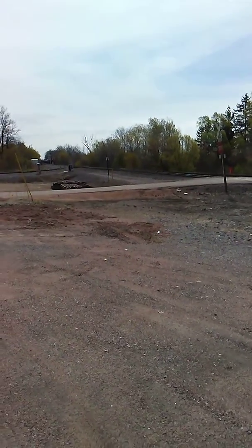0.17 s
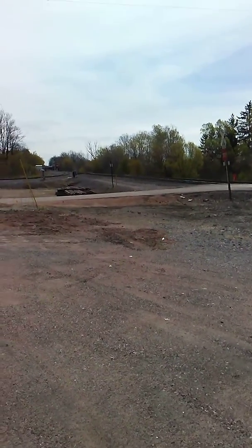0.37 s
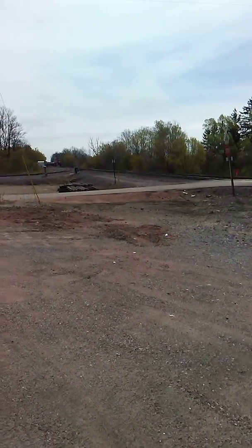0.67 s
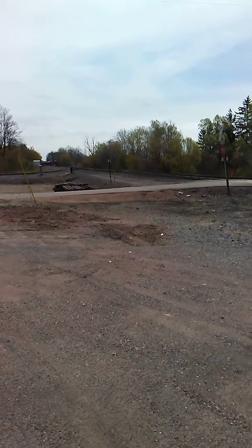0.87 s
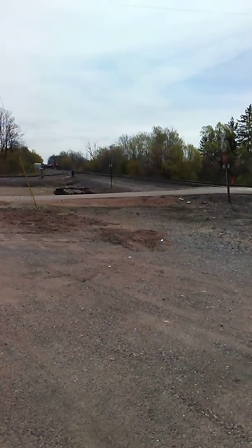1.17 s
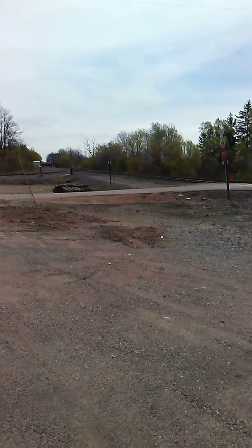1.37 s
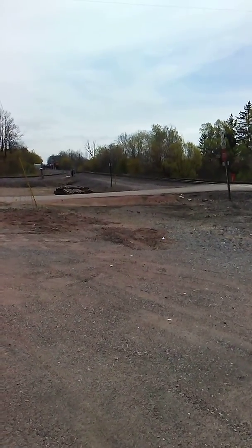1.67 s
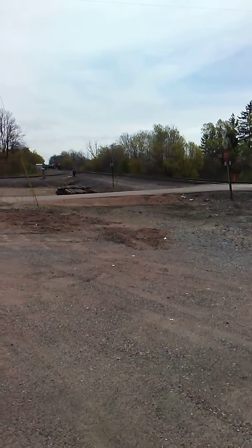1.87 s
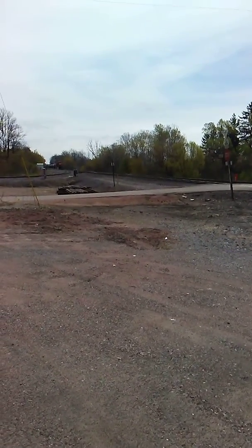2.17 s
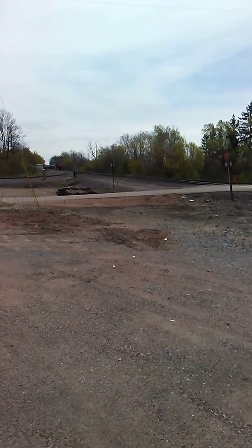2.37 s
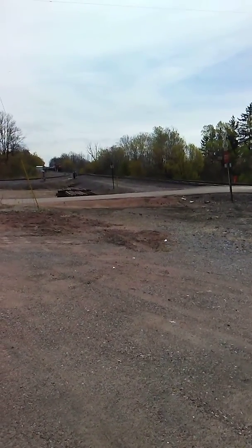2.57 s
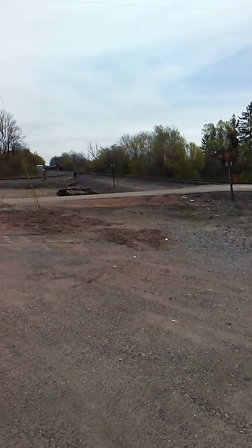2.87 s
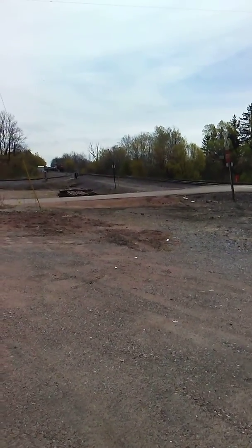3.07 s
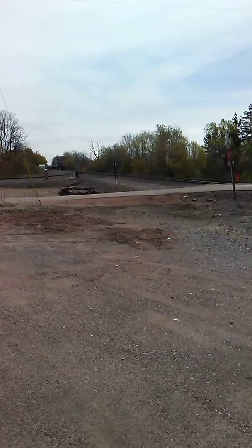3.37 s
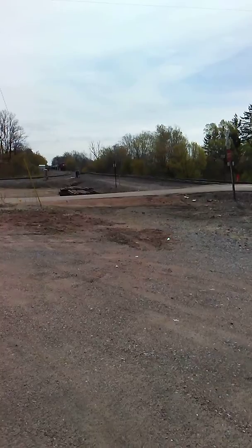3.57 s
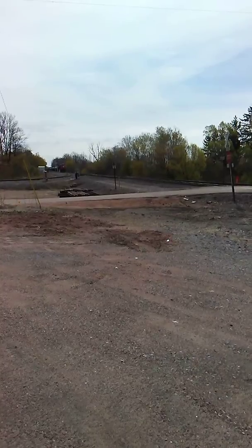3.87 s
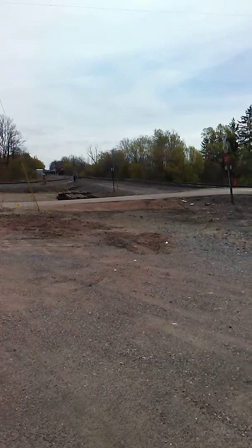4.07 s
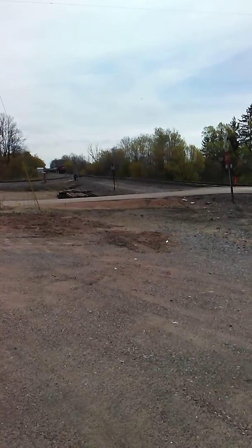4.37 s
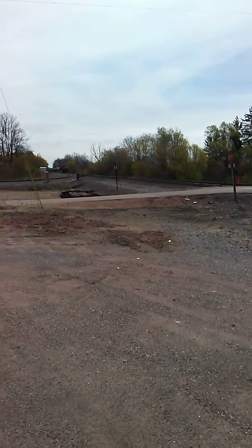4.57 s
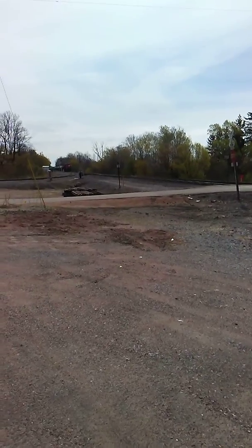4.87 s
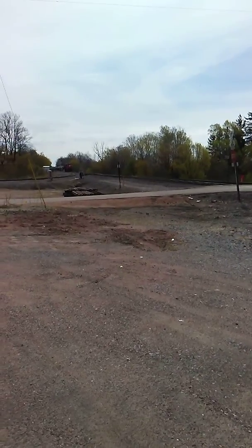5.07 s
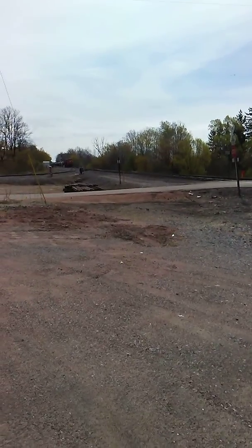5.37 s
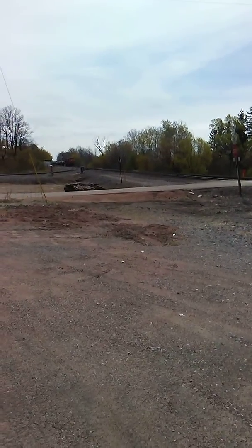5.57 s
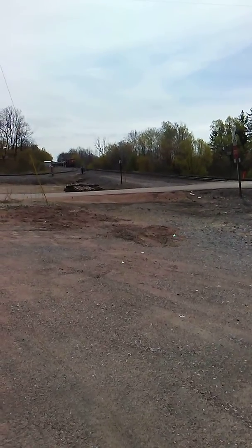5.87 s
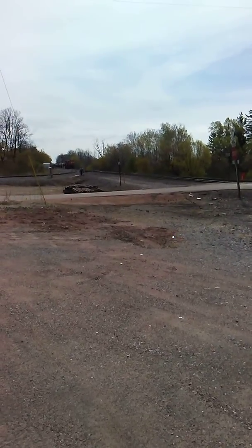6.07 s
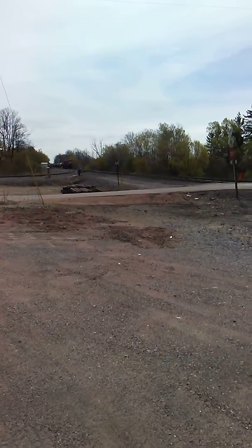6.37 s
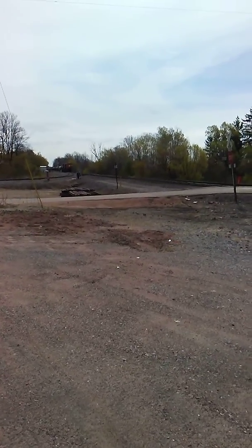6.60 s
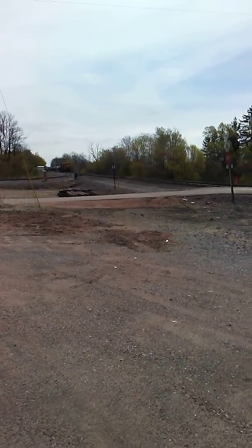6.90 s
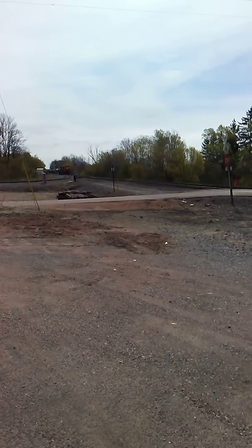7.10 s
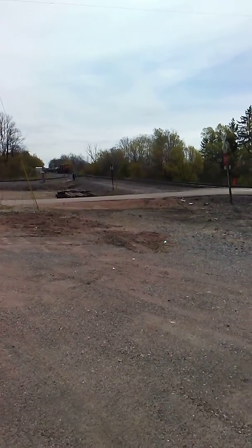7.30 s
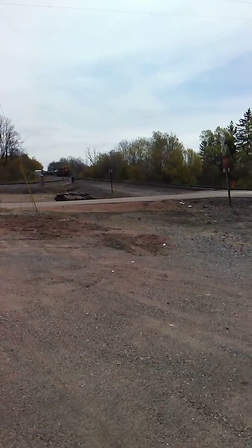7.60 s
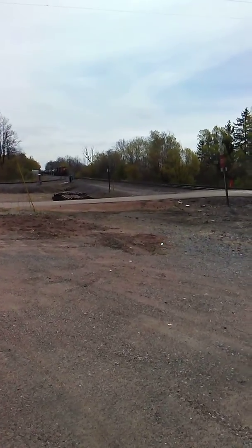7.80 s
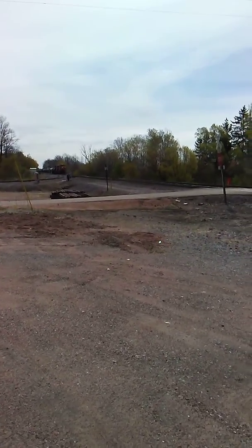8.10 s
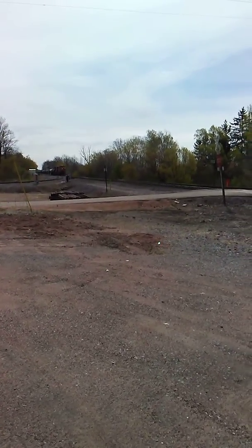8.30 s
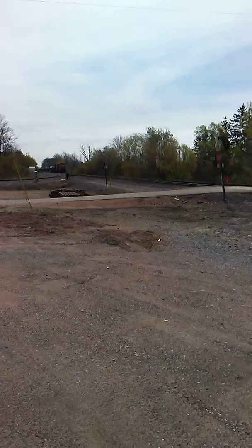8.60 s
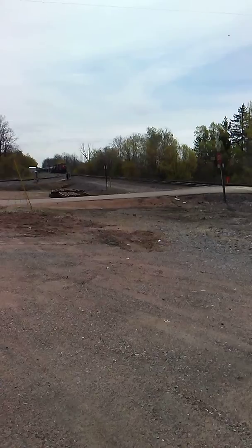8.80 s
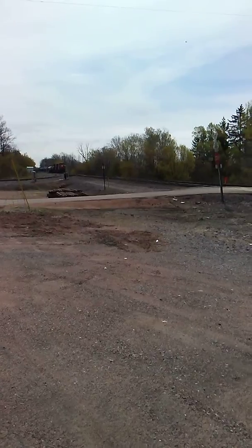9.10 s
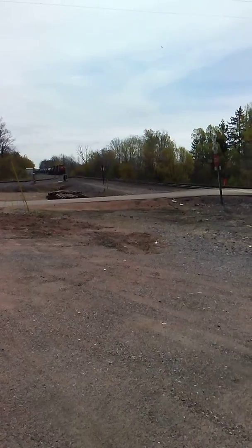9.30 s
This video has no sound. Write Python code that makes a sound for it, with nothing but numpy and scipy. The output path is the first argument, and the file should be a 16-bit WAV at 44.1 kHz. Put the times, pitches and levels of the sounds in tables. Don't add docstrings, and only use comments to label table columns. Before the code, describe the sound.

Open country beside a rural rail crossing, heard through a phone microphone. In the first 1.2 s there is soft air hiss, a brief wind puff, small dry gravel ticks close by and two faint strokes of a far bell. At 1.2 s an oncoming freight locomotive sounds a loud, dissonant chord of six air trumpets, held until about 5.1 s; its tones fade and swell separately in moving air, with a hazy echo from trees. Wind flutters from 3 s. The chord sags into a reverberant tail as, from 5.7 to 7.4 s, hard gusts thump and crackle against the microphone. A high, quick sparrow trill runs from 5.7 to 7.6 s, with faint bell strokes from 5.6 to 8.4 s. Low diesel drone and wheel roar grow, with soft flange swishes. At 8.5 s a nearer, stronger horn blast bursts in, brightening as rails sing faintly, and cuts off at 9.4 s.

```python
import sys
import numpy as np
from scipy import signal
from scipy.fft import rfft, irfft, next_fast_len
from scipy.io import wavfile
from scipy.ndimage import uniform_filter1d, minimum_filter1d

SR = 44100
rng = np.random.default_rng(int(sys.argv[2]) if len(sys.argv) > 2 else 0)


def gain_from_decibels(decibels):
    exponent = np.asarray(decibels, float) / 20
    return 10 ** exponent


def master_out(mix):
    frames = np.transpose(np.atleast_2d(mix))
    ceiling = np.clip(frames, -1, 1)
    pcm = np.round(ceiling * 32767).astype(np.int16)
    wavfile.write(sys.argv[1], SR, pcm)


N = 416744
T = np.arange(N) / SR

# frequency in Hz, level in dB per Hz.
AIR_SPECTRUM = [(4200, -22), (4600, -6.5), (5500, -7), (6400, -3), (8000, 0), (11000, -2), (15800, -8.5),
                (16500, -55)]
# time in seconds, peak in dB.
GRAVEL_TICKS = [(0.1191, -49.5), (0.1945, -47.5), (0.3027, -62.5), (0.4658, -45.5), (0.6145, -45),
                (0.7637, -39), (0.8594, -39), (0.9544, -50), (1.072, -42.5), (1.2186, -41), (2.415, -35.5)]
# time in seconds, then the level of each partial in dB.
BELL_STROKES = [(.1, -49.5, -47, -56), (.55, -50, -46, -55), (5.6, -46.5, -54, -49),
                (6.13, -40.5, -36, -53), (6.48, -42, -51, -46), (6.74, -39.5, -58, -49),
                (7.25, -50, -46, -50), (7.6, -54, -54, -52), (8.14, -44.5, -49, -52), (8.4, -42, -47, -46)]
BELL_PARTIALS_HZ = [1205, 2016, 1570]
# frequency in Hz, level in dB per Hz.
ROLL_SPECTRUM = [(24, -64.5), (40, -37.5), (70, -14), (86, -11), (120, -13.5), (239, -2.5), (333, -22.5),
                 (433, -21), (770, -10.5), (951, -26.5), (1220, -12.5), (1510, -17.5), (2010, -11.5),
                 (2210, -19), (3100, -35), (3900, -32.5), (5000, -61)]
# time in seconds, level in dB.
ROLL_LEVEL = [(0, -35), (1.2, -34), (5.8, -30.5), (6.07, -30.5), (6.19, -26), (6.36, -28.5), (6.7, -29.5),
              (7.1, -31), (7.5, -30), (8.4, -28.5), (9.45, -30)]
# frequency in Hz, level in dB.
DIESEL_ORDERS = [
    (53.8, -52),
    (75.4, -46),
]
# centre in seconds, half length in seconds, level in dB.
FLANGE_SWISHES = [
    (6.3, .12, -61),
    (6.8, .1, -55),
    (7.43, 0.12, -44),
    (7.952, 0.059, -46),
    (8.397, 0.21, -41.5),
]
# time in seconds, level in dB.
BREEZE_LEVEL = [(0, -38.5), (.6, -48.5), (2.5, -40.5), (4, -41), (5.6, -30), (7.5, -31.5), (8.4, -28),
                (8.7, -35), (9.45, -35)]
# centre in seconds, half length in seconds, then buffet, deep rumble and
# bright rush in dB.
PORT_EDDIES = [(0.21, .04, -24.5, -52, -23.5), (0.723, 0.02, -38, -48, -44), (3, 0.065, -38, -54, -50),
               (3.423, 0.047, -33.5, -50, -51.5), (3.597, 0.026, -28.5, -54.5, -45),
               (4.132, 0.038, -35.5, -40, -47), (4.29, 0.035, -23.5, -33, -43),
               (4.466, 0.057, -26, -40, -45), (4.803, 0.17, -30, -50.5, -46), (5.19, 0.1, -22, -44.5, -35),
               (5.453, .08, -35, -39, -38), (5.733, 0.086, -44, -50, -28),
               (5.946, 0.074, -24.5, -35, -24.5), (6.058, 0.068, -26, -36, -15),
               (6.12, 0.012, -30, -40, -13), (6.33, 0.13, -22, -33, -24), (6.73, 0.054, -25, -30.5, -17.5),
               (6.898, 0.08, -22, -45, -24), (7.05, 0.087, -22.5, -33, -26.5),
               (7.278, 0.083, -24.5, -37, -16), (7.557, 0.13, -28, -40, -28),
               (7.71, 0.076, -35.5, -36, -35), (7.93, 0.056, -40, -38, -34),
               (8.213, 0.093, -32, -49, -25.5)]
# time in seconds, peak in dB, ringing in Hz, snap in dB.
GUST_KICKS = [(0.196, -29, 243, -27), (5.775, -7, 178, -31), (5.96, -8, 287, -22), (6.011, -0.5, 308, -19),
              (6.037, -0.5, 292, -23), (6.119, 3, 286, -10), (6.706, 1, 290, -22), (6.918, -5, 332, -30),
              (6.947, -1.5, 295, -32), (7.261, -3, 420, -4), (7.344, -3, 258, -6), (8.201, -27, 190, -15)]
# valve opens in seconds, then the opening level of the 760 Hz, low, middle and high lines
# in dB.
HORN_BLASTS = [
    (1.196, -18.5, -17, -24, -23.5),
    (8.522, -11, -12.5, -19, -21),
]
# end in seconds, pressure build-up in seconds, settled pitch of the middle
# trumpet in Hz, first sharpness in Hz.
AIR_SUPPLY = [
    (5.6, .035, 379, 6.5),
    (9.45, .012, 379.5, 7),
]
# lag of tones under 450 Hz in seconds, lag of the three high trumpets in
# seconds.
BELL_FILLING = [
    (.02, 0.4),
    (.35, 0.007),
]
# the 760 Hz, low, middle and high lines in dB per second.
NEARING_GAIN = [
    (1.53, 0.24, 1.94, 0.65),
    (0.48, -1.4, 4, 6.8),
]
# the 760 Hz, low, middle and high lines in dB per second.
DYING_FALL = (52, 13, 44, 53)
# rest pitch in Hz, how strongly low air pressure sharpens it (a ratio).
HORN_TRUMPETS = [
    (274.6, 1.1),
    (324.3, 1.1),
    (379.2, 1),
    (494.4, .6),
    (527.0, 1.8),
    (603.0, 1.1),
]
HORN_OVERTONES = [
    [-32, -38, -31.5, -27, -34.5, -27, -29, -41, -39, -51, -60, -53, -53, -49.5, -66.5],
    [-25, -25, -30.5, -28.5, -34, -40.5, -33.5, -46.5, -57, -57.5, -48, -55],
    [-31.5, -13, -29, -26.5, -20, -31, -36.5, -48, -44.5, -52.5, -59.5],
    [-25.5, -34.5, -41, -33, -44, -56.5, -50, -56.5],
    [-23.5, -35.5, -28.5, -30.5, -50.5, -55, -51.5],
    [-34, -40, -37],
]
# centre in seconds, half length in seconds, lines around
# this frequency in Hz, change in dB.
AIR_BENDS = [(1.437, .13, 760, 3), (1.454, .08, 1300, 3), (1.704, 0.041, 2000, 1.5),
             (2.026, .13, 760, -10.5), (2.309, 0.3, 760, -5), (2.426, .12, 450, 2), (2.909, 0.061, 760, -3),
             (3.048, 0.19, 450, 3), (3.104, 0.16, 2000, 1.5), (3.101, 0.17, 760, -3.5),
             (3.443, 0.22, 450, 2), (3.797, 0.32, 760, 3), (3.85, 0.13, 1300, -1.5),
             (3.695, .3, 2000, -0.5), (4.122, .1, 2000, 7), (4.264, .18, 1300, 3), (4.483, 0.17, 2000, 4.5),
             (4.494, .1, 450, -1), (4.948, 0.17, 760, 0.5), (5.17, 0.087, 760, -5), (5.34, 0.07, 760, 3.5),
             (5.349, 0.12, 450, 4), (8.541, .03, 450, 5), (8.589, .06, 1300, -2.5), (8.759, 0.089, 760, 1),
             (9.33, 0.073, 760, 0)]
# centre in seconds, half length in seconds,
# frequency in Hz, change in dB.
AIR_GLINTS = [(1.5, .2, 1330, 3.5), (1.45, .3, 973, -6), (1.4, .2, 1200, 0.5), (2.3, .08, 2274, 5.5),
              (3.2, .08, 1100, 5.5), (3.1, .1, 2000, 6), (2.8, 0.82, 650, -2.5), (3.6, 0.32, 1050, 3.5),
              (3.2, .4, 1900, -3), (3.3, 0.17, 2000, 1.5), (4.6, .45, 1560, 3.5), (5.5, 0.38, 1330, -4.5),
              (5.1, .2, 850, 1.5), (9, 0.22, 1900, 3.5), (9.25, 0.23, 1600, -3.5), (8.75, 0.23, 350, -3.5),
              (1.55, .12, 530, 5), (1.7, 0.32, 650, -5), (2.2, .2, 1100, -4), (2.35, 0.23, 535, -4),
              (2.6, .2, 490, 5), (3.25, .15, 535, -6), (3.5, 0.18, 1300, 6.5), (3.5, .5, 1500, -4),
              (4.4, .4, 380, -3), (5.1, 0.29, 490, -5), (8.6, .1, 650, 4), (8.9, .15, 1090, 3),
              (9, 0.38, 1660, -4.5), (9.1, .3, 320, -3)]
# frequency in Hz, level in dB.
MIC_WHINE = [(14080, -77.5), (14450, -86), (15240, -81), (15350, -84.5), (15490, -84), (15680, -89.5)]


def unit(x):
    return x / np.sqrt(np.mean(np.abs(x) ** 2))


def curve(rows):
    s, *columns = np.transpose(rows)
    return np.array([np.interp(T, s, c) for c in columns])


def coloured(points):
    hz, db = np.transpose(points)
    size = next_fast_len(N)
    f = np.fft.rfftfreq(size, 1 / SR) + 1e-3
    gain = gain_from_decibels(np.interp(np.log(f), np.log(hz), db))
    return unit(irfft(rfft(rng.standard_normal(size)) * gain, size)[:N])


def wander(rate, size=N):
    step = 64
    pole = np.exp(-2 * np.pi * rate * step / SR)
    slow = signal.lfilter([1], np.poly([pole] * 2), rng.standard_normal(size // step + 2))
    return np.interp(np.arange(size) / step, np.arange(len(slow)), unit(slow))


def band(x, lo_hz, hi_hz, order=2):
    return signal.sosfilt(signal.butter(order, [lo_hz, hi_hz], "band", fs=SR, output="sos"), x)


def band_noise(lo_hz, hi_hz, order=2):
    return band(rng.standard_normal(N), lo_hz, hi_hz, order)


def add(out, s, x):
    i = int(s * SR)
    out[i:i + len(x)] += x[:N - i]


def hump(s, half, t=T):
    return np.exp(-((t - s) / half) ** 2)


def tone(hz):
    return np.sin(2 * np.pi * np.cumsum(hz) / SR)


def open_air():
    return gain_from_decibels(-68.5 + 0.94 * wander(9.) + .8 * wander(1.)) * coloured(AIR_SPECTRUM)


def bell():
    t60_s, rise_s = np.c_[[2.7, 0.69, 2.8]], 0.016
    ring = 0
    for s, *db in BELL_STROKES:
        age = np.maximum(T - s, 0)
        stroke = gain_from_decibels(np.c_[db] - 60 * age / t60_s) * (1 - np.exp(-age / rise_s))
        ring = np.maximum(ring, stroke)
    partials = np.array([tone(hz + 7.6 * wander(6.7)) for hz in BELL_PARTIALS_HZ])
    flutter = gain_from_decibels(3.2 * np.array([wander(7.) for _ in BELL_PARTIALS_HZ]))
    return np.sum(gain_from_decibels(9.0) * ring * flutter * partials, 0)


def sparrow():
    start_s, gap_s, slowing_s, notes = 5.681, .05337, .000059, 34
    peak_db, peak_note, arc_db = -50, 16, .042
    out, t = np.zeros(N), np.arange(int(.024 * SR)) / SR
    for n, z in enumerate(rng.standard_normal((notes, 3))):
        db = peak_db - arc_db * (n - peak_note) ** 2 + 1.2 * z[1]
        low_db = max(-1.5 - .05 * (n - 11) ** 2, -8) + 1.5 * z[2]
        low_lobes = hump(.0115, .0031, t) + .9 * hump(.0185, .0026, t)
        shape = hump(.005, .0025, t) + gain_from_decibels(low_db) * low_lobes
        hz = 7700 * (1 + .008 * z[0]) - 112000 * t
        s = start_s + gap_s * n + slowing_s * n ** 2
        add(out, s - .003, gain_from_decibels(db) * shape * tone(hz))
    t = np.arange(SR // 4) / SR
    leaves = unit(rng.standard_normal(len(t)) * np.exp(-t / .05)) / np.sqrt(len(t))
    return out + gain_from_decibels(-10) * signal.fftconvolve(out, leaves)[:N]


def gravel():
    out, t = np.zeros(N), np.arange(-400, 600) / SR
    for s, db in GRAVEL_TICKS:
        add(out, s - .004, gain_from_decibels(db) * rng.standard_normal(len(t)) * hump(0, .0045, t))
    return band(out, 7000, 9800)


def wind():
    steady = gain_from_decibels(curve(BREEZE_LEVEL) + np.c_[[0, -17.5, -5.5]])
    passing = sum(gain_from_decibels(np.c_[db]) * hump(s, half) for s, half, *db in PORT_EDDIES)
    buffet, deep, rush = steady + passing
    lumps = gain_from_decibels(2.6 * wander(35.))
    out = buffet * unit(lumps * band_noise(159.7, 310.4))
    out += gain_from_decibels(-5.0) * rush * unit(lumps * band_noise(260, 622, order=3))
    out += deep * unit(band_noise(53, 88) * gain_from_decibels(.8 * wander(6.)))
    t = np.arange(-400, 800) / SR
    for s, db, hz, snap_db in GUST_KICKS:
        kick = np.exp(-np.abs(t) / 0.0034) * np.cos(2 * np.pi * hz * t)
        snap = hump(0, .00074, t) * np.cos(2 * np.pi * 640 * t)
        add(out, s - .004, gain_from_decibels(db - 4.5) * kick)
        add(out, s - .005, gain_from_decibels(snap_db - 6.5) * snap)
    return out


def train():
    near_db = curve(ROLL_LEVEL)[0]
    roar = gain_from_decibels(near_db + 1.2 * wander(2.7)) * coloured(ROLL_SPECTRUM)
    drone = sum(gain_from_decibels(db + 1.5 * wander(2.)) * tone(hz + .8 * wander(2.)) for hz, db in DIESEL_ORDERS)
    swell = sum(gain_from_decibels(db - 4) * hump(s, half) for s, half, db in FLANGE_SWISHES)
    swish = swell * unit(band_noise(3350, 3900))
    return swish + roar + gain_from_decibels(0.85 * (near_db - near_db[0])) * drone


def rails(horn):
    singing = gain_from_decibels(-62 + 10.5 * np.minimum(T - 9.27, .3))
    shaken = gain_from_decibels(-55) * uniform_filter1d(horn ** 2, size=8000)
    return (singing + shaken) * gain_from_decibels(1.3 * wander(15.)) * unit(band_noise(6000, 7400))


def trees(x):
    t = np.arange(2 * SR) / SR
    decay = np.exp(-np.log(1000) * t / 3.84) * (t > .04)
    echo = unit(rng.standard_normal(len(t)) * decay) / np.sqrt(len(t))
    return gain_from_decibels(-12.5) * signal.fftconvolve(x * wander(16.0), echo)[:N]


def line_group(hz):
    return [1, 0, 2, 3][np.searchsorted([690, 805, 1725], hz)]


def blast(start, air, nearing, deep_lag, high_lag):
    opens, *start_db = start
    ends, build, settled, quick = air
    valve_shut_s, middle_rest_hz = 5.12, 379.2
    first, last = int(opens * SR), min(int(ends * SR), N)
    size, t = last - first, T[first:last]
    age = np.abs(t - opens)
    shut = np.maximum(t - valve_shut_s, 0) * (opens < valve_shut_s)

    level_db = np.c_[start_db] + np.outer(nearing, age) - np.outer(DYING_FALL, shut)
    for s, half, hz, db in AIR_BENDS:
        level_db[line_group(hz)] += db * hump(s, half, t)
    pressure = 1 - np.exp(-age / build)
    gain = gain_from_decibels(level_db) * pressure ** np.c_[[1.4, .8, 1.6, 1.8]]
    gain = gain * np.clip((ends - t) / 0.026, opens > valve_shut_s, 1)

    pitch = settled + quick * np.exp(-age / .09) + 1.8 * np.exp(-age / .4) + 7 * shut
    sharp = pitch / middle_rest_hz - 1
    clear = np.clip(1 - shut / 0.51, 0, 1)
    deep, high = (1 - .8 * np.exp(-age / lag) for lag in (deep_lag, high_lag))
    halo = gain_from_decibels([-19, -21.5, -8, -2.5])[:, None] * (1 + 1.75 * (1 - clear))
    halo = halo * gain_from_decibels(-.55 * (opens - HORN_BLASTS[0][0]))

    coarse = np.linspace(t[0], t[-1], 500)
    glint_humps = np.array([hump(s, half, coarse) for s, half, *_ in AIR_GLINTS])
    sound, power = np.zeros((4, size)), np.zeros(4)
    for (rest, sharpen), overtones in zip(HORN_TRUMPETS, HORN_OVERTONES):
        phase = 2 * np.pi * np.cumsum(rest * (1 + sharpen * sharp)) / SR
        for k, db in enumerate(overtones, 1):
            hz = k * rest
            group = line_group(hz)
            turn = k * phase + 2 * np.pi * rng.random()
            depth = min(hz / 5200, .42) * (group > 0)
            spread = 15 + 0.046 * hz
            norm = np.sqrt(1 + 2 * depth ** 2)
            fade = [clear * depth * wander(1.5, size) / norm for _ in "xy"]
            scatter = [halo[group] * wander(spread, size) for _ in "xy"]
            filling = deep if hz < 450 else high if rest > 450 else 1
            in_phase = clear / norm * filling + fade[0] + scatter[0]
            quadrature = fade[1] + scatter[1]
            near_db = [d * np.exp(-(np.log2(hz / g) / .075) ** 2) for *_, g, d in AIR_GLINTS]
            glint = np.interp(t, coarse, gain_from_decibels(near_db @ glint_humps))
            sound[group] += glint * gain_from_decibels(db) * (in_phase * np.cos(turn) + quadrature * np.sin(turn))
            if rest < 300 and k in (2, 3):
                sound[group] += 130 * np.maximum(sharp, 0) * gain_from_decibels(db) * np.cos(turn)
            power[group] += gain_from_decibels(db) ** 2 / 2
    out = np.zeros(N)
    out[first:last] = np.sum(gain * sound / np.sqrt(power)[:, None], 0)
    return out


def horn_over_ground():
    rows = zip(HORN_BLASTS, AIR_SUPPLY, NEARING_GAIN, BELL_FILLING)
    horn = sum(blast(start, air, nearing, *lags) for start, air, nearing, lags in rows)
    horn = horn + trees(horn)
    return horn + .06 * band(horn ** 2, 200, 4000)


def phone_band(x):
    return signal.sosfilt(signal.ellip(6, .5, 52, 3980, fs=SR, output="sos"), x)


def scene():
    horn = horn_over_ground()
    low = phone_band(horn + wind() + train() + bell())
    return (low + open_air() + rails(horn) + sparrow() + gravel())[None]


def low_pass(x):
    return signal.sosfilt(signal.butter(12, 15830, fs=SR, output="sos"), x)


def record(dry):
    dry = signal.sosfilt(signal.butter(3, 42, "high", fs=SR, output="sos"), dry)
    drive = uniform_filter1d(np.abs(dry), size=2000) / .3
    whine = sum(gain_from_decibels(db) * tone(hz + 9.5 * wander(20.)) for hz, db in MIC_WHINE)
    need = np.minimum(1, .98 / (np.abs(dry) + 1e-9))
    duck = minimum_filter1d(need, size=97)
    for _ in "xyz":
        duck = uniform_filter1d(duck, size=33)
    highest = need == minimum_filter1d(need, size=241)
    crest = highest * np.sign(dry) * np.tanh((1 - need) / .45)
    ticks = gain_from_decibels(-21) * signal.lfilter([1], np.poly([.7, .7]), crest)
    end = np.clip((T[-1] - T) / .002, .4, 1)
    return low_pass(end * (duck * dry - ticks + drive * whine))


dry = scene()
out = record(dry)
master_out(out)
```